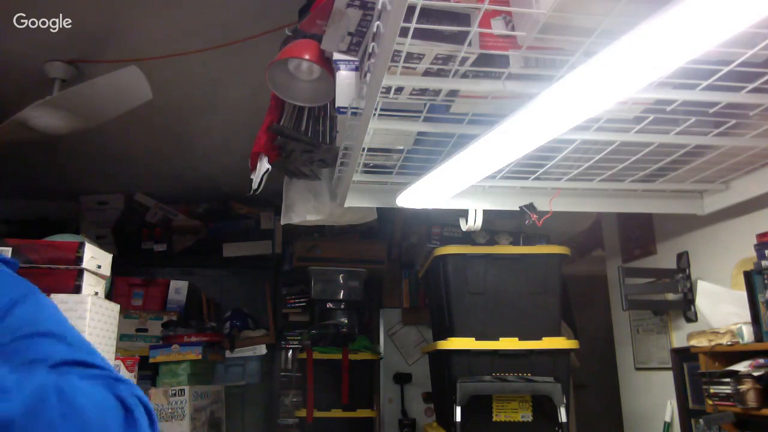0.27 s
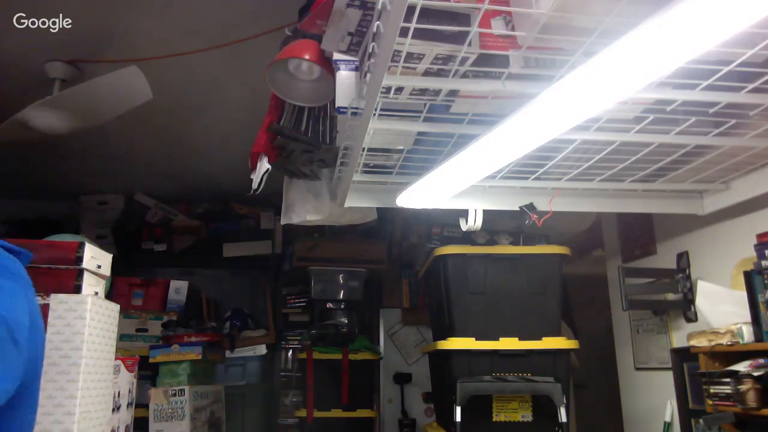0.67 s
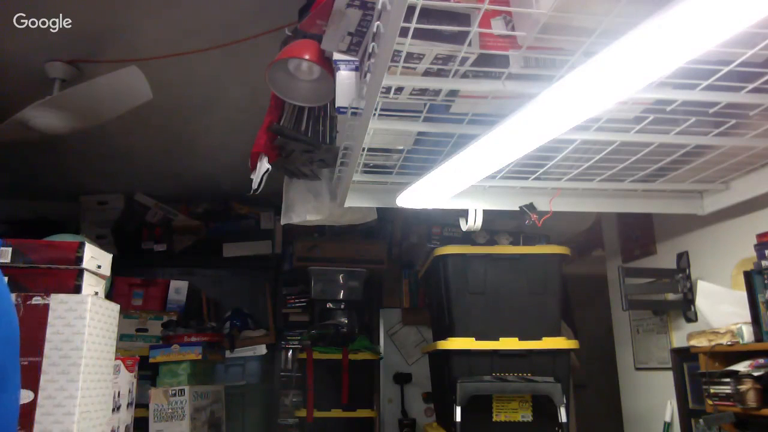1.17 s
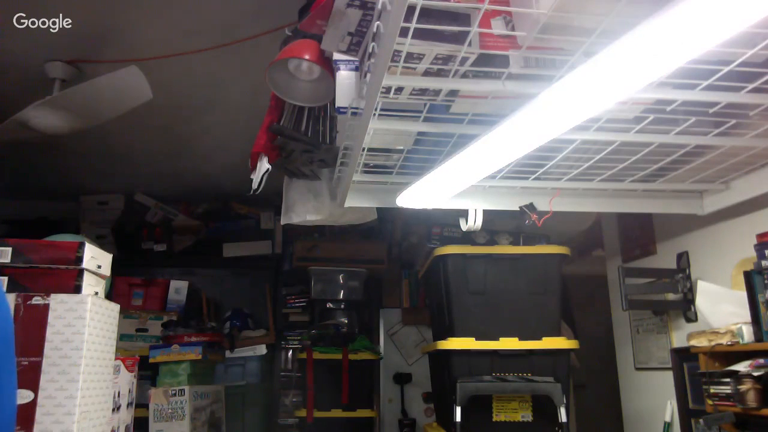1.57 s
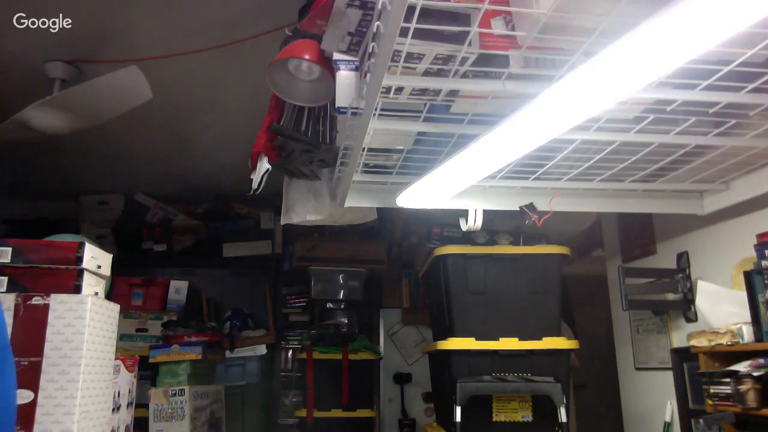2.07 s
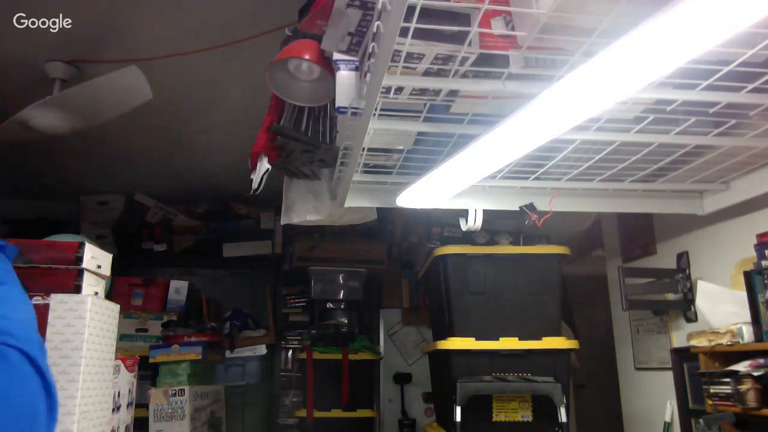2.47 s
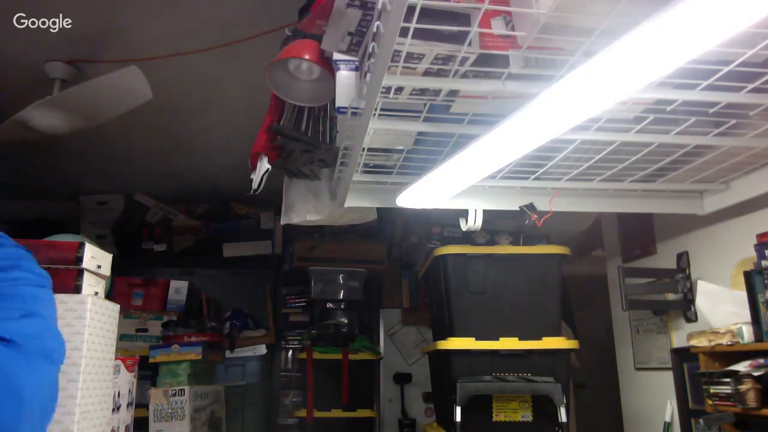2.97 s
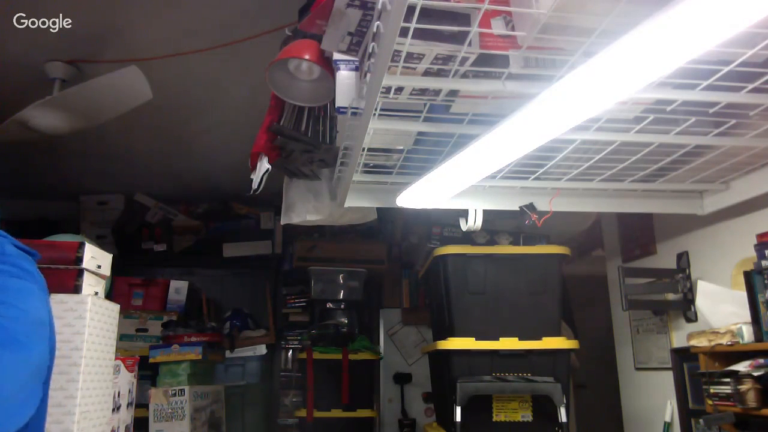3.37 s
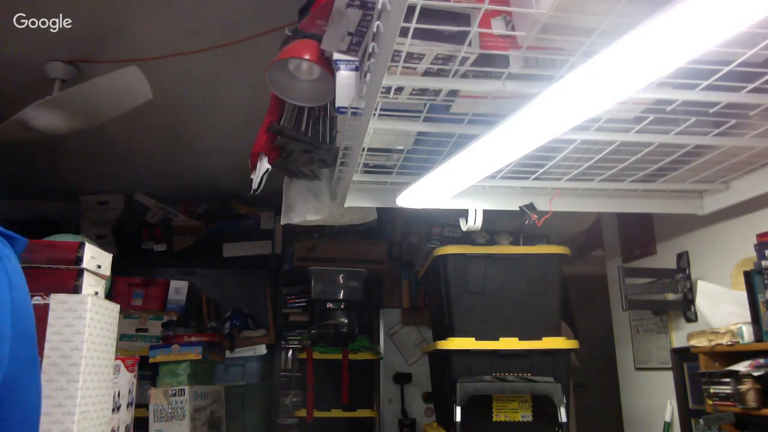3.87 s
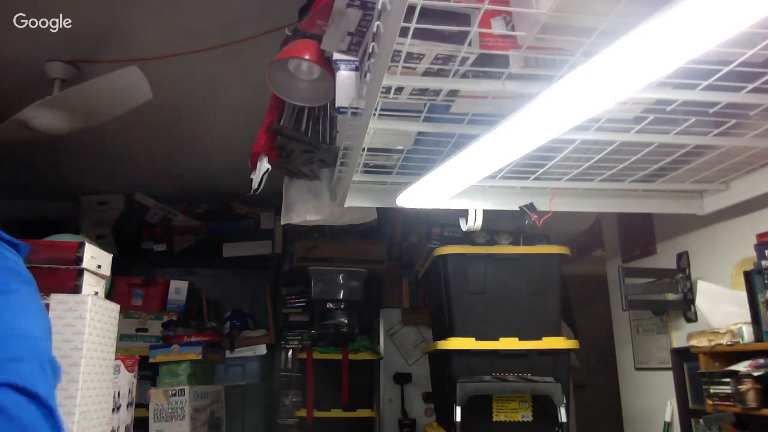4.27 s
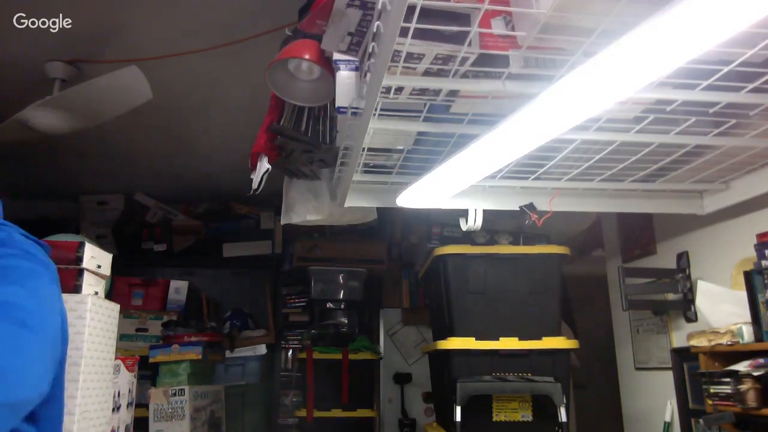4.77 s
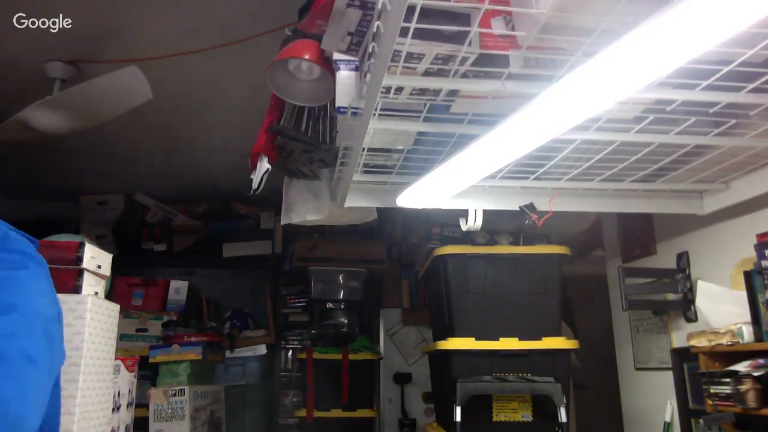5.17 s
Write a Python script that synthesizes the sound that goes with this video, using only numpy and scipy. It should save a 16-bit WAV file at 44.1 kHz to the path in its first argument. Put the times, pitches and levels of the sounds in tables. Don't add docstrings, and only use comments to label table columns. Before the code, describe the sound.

Stiff packing fill crackles and rustles in loud, irregular bursts as it is shoved into a hollow cardboard box, with dull knocks and near-silent pauses.

```python
import sys
import numpy as np
from scipy import signal
from scipy.fft import rfft, irfft, next_fast_len
from scipy.io import wavfile
from scipy.ndimage import uniform_filter1d

SR = 44100
rng = np.random.default_rng(int(sys.argv[2]) if len(sys.argv) > 2 else 0)


def voltage_ratio(level):
    return 10 ** (np.asarray(level, float) / 20)


def dump(signal):
    limited = np.clip(np.atleast_2d(signal).T, -1, 1)
    pcm = np.round(limited * 32767).astype(np.int16)
    wavfile.write(sys.argv[1], SR, pcm)


N = 239414
STEP = 32
TIMES = np.arange(N) / SR
CONTROL_TIMES = np.arange(N // STEP + 2) * STEP / SR

# frequency in Hz, level in dB.
TOP = [(6800, -8), (7900, -13.5), (8020, -5.5), (9500, -1.5), (11850, -8), (12050, -12), (14000, -18),
       (15700, -29)]
# frequency in Hz, level in dB.
PORT = [(30, -38), (60, -55.5), (150, -18), (250, -5.5)]


def evened(x):
    return x / np.sqrt(np.mean(x ** 2, -1, keepdims=True) + 1e-20)


def read(points, hz):
    f, value = np.transpose(points)
    return np.interp(np.log(hz + 1), np.log(f + 1), value)


def filtered(x, db_of):
    size = next_fast_len(N + 4096)
    gain = voltage_ratio(db_of(np.fft.rfftfreq(size, 1 / SR)))
    return irfft(rfft(x, size) * gain, size)[..., :N]


def resonate(x, hz, width, order=1):
    r = np.exp(-np.pi * width / SR)
    poles = np.poly([r * np.exp(2j * np.pi * hz / SR)] * order)
    return 2 * signal.lfilter([(1 - r) ** order], poles, x).real


def slide(x, hz, width, order=2):
    turn = np.exp(2j * np.pi * np.cumsum(hz) / SR)
    r = np.exp(-np.pi * width / SR)
    smooth = signal.lfilter([(1 - r) ** order], np.poly([r] * order), x / turn)
    return 2 * (turn * smooth).real


def wander(count, length, seconds):
    span = max(int(seconds * SR / STEP), 1)
    noise = rng.standard_normal((count, length))
    return evened(uniform_filter1d(uniform_filter1d(noise, span), span))


def colour_db(hz):
    # frequency in Hz, level in dB per Hz.
    lower_colour = [(35, -59), (60, -60.5), (194, -2.5), (382, -1.5), (431, 1), (604, -9.5), (980, -10.5),
                    (1150, -8), (1290, -12), (1570, -11), (7000, -11), (9100, -29), (15400, -120)]
    return read(lower_colour, np.minimum(hz, 6800)) + read(TOP, hz)


def push(t):
    # start in seconds, length in seconds, crackle in dB,
    # large folds in dB and fine creases in dB, these two relative to the crackle.
    shoves = [(0.0, 0.065, -20.5, -4, -17), (0.094, 0.2, -22.5, -4.5, -18.5),
              (0.283, 0.019, -20.5, -2, -17), (0.673, 0.26, -15.5, -6, -4.5), (0.939, 0.11, -24, 0.5, -1.5),
              (1.32, 0.195, -18, -2, -10.5), (1.812, 0.29, -15.5, -5.5, -5),
              (2.13, 0.094, -27.0, -0.5, -6.5), (2.647, 0.051, -23, -0.5, -10.5),
              (2.811, 0.5896, -15.5, -5.5, -7.5), (3.489, 0.077, -22, -8, -3.5),
              (3.649, 0.047, -18.5, -6.5, -3), (3.712, 0.095, -17, -2.5, -4),
              (3.83, 0.019, -20.5, -2.5, -8.5), (3.948, 0.037, -29, 4, -5.5), (4.19, 0.062, -42, 16, -7.5),
              (4.657, 0.1, -20.5, -17, -4.5), (4.917, 0.13, -27.5, -8.5, -2), (5.4, 0.05, -36.5, -3.5, 2)]
    settles = [(0, .03, -34, -20, 6), (5.11, .035, -39, 4, -20), (2.492, .03, -31, -8, -4),
               (1.3, .03, -31, 6, -14), (.875, .055, -19, -3, -4), (.44, .04, -36, -5, -3),
               (.663, .01, -24, -5, -15), (0.329, 0.029, -35, 1, -11), (2.625, 0.035, -30, -8, 2),
               (4.14, 0.046, -48.5, 4, -3), (4.34, .01, -39, -6, -8), (0.492, 0.14, -37, -7.5, -14.5),
               (1.065, 0.195, -30, -0.5, -10.5), (1.528, 0.086, -34.5, -2.5, -9.5),
               (1.777, 0.056, -36.5, -17, 2), (2.248, 0.14, -45.5, -9, -2.5),
               (2.565, 0.094, -40.5, -4.5, -3), (2.772, 0.12, -21, -13, -8), (3.443, 0.17, -25, -3, -4.5),
               (3.841, 0.077, -37, 5, -10), (4.01, 0.12, -38.5, 6.5, -3), (4.283, 0.037, -50, 9, -9),
               (4.615, 0.035, -48.5, -21, 7.5), (4.791, 0.095, -32, -12.5, -14.5),
               (5.07, 0.054, -34.5, 2, -10.5), (5.31, 0.07, -52.5, -6.5, 4)]
    rest_db = [-74, -66, -63.5, -68.5]
    walls_db = -2
    power = voltage_ratio(np.array(rest_db))[:, None] ** 2 + 0 * t
    for table, rise, fall in (shoves, 2404, 555), (settles, 1303, 421):
        falls = fall * np.array([[1], [1], [1], [1.6]])
        for s, length, db, fold_db, crease_db in table:
            hold_db = rise * np.minimum(t - s, 0) - falls * np.maximum(t - s - length, 0)
            class_db = db + np.array([fold_db + walls_db + crease_db, fold_db, 0, crease_db])
            power += voltage_ratio(class_db[:, None] + np.maximum(hold_db, -200)) ** 2
    return power


def effort(hz, t):
    # lower edge in Hz, upper edge in Hz.
    classes = [
        (150, 650),
        (700, 1700),
        (2100, 7500),
        (8200, 15000),
    ]
    # frequency in Hz, class number.
    ladder = [(600, 0), (720, 1), (1250, 1), (1650, 2), (3500, 2), (7900, 2.5), (8100, 3)]
    # time in seconds, peak in dB, large folds in dB, fine creases in dB.
    snaps = [(0.402, -32, -7, -17), (0.4244, -17, -11, -2), (0.469, -25.5, -6.5, -10),
             (0.557, -31, -7, -16), (0.592, -28, -8, -12), (1.042, -24.5, -7, 1), (1.1544, -27.5, 8, 3.5),
             (1.19, -27, 9, -1), (1.235, -21.5, -4, -3), (1.2974, -29, 7.5, -20), (1.68, -33.5, -17, -6),
             (2.122, -26, 13.5, 7.5), (2.36, -37.5, 0, 6), (2.3865, -38.5, -16, 11), (2.4713, -45.5, -6, 0),
             (2.562, -41, -10, -15.0), (2.7437, -33, 2, 1), (3.8935, -34, -6, 6), (4.067, -30, 12, 2.5),
             (4.12, -49, 9, 15), (4.2378, -26.5, 7.5, 9), (4.2874, -35, -1, 3), (4.456, -55, -1, -7),
             (4.532, -42, -27, -6), (4.9945, -16, 0, 0.5), (5.1866, -36.5, -29, 0.5)]
    slumps = [(0.097, -16, -7.5, -25), (0.1925, -14.5, -20.5, -35), (0.2229, -18.5, -24, -15),
              (0.2915, -6.5, -29, -15), (0.7, -5, -11, -14.5), (0.82, -17, -32, -16), (1.329, -23, 11, -12),
              (1.3678, -11, -4, 0.5), (1.4586, -9.5, -16, -5.5), (1.5084, -25, -12, -3),
              (1.85, -6.5, -57, -2), (1.9659, -12, -2, -4), (2.2, -16.5, -9, -8.5), (2.65, -11.5, -25, -8),
              (2.687, -19, -11, -12.5), (2.9387, -12, -5, -1.5), (3.057, -31, -3, 14),
              (3.1418, -13.5, -29, -8), (3.2096, -28, -22, 10), (3.4431, -27, -22, 6),
              (3.6077, -22.5, -8, -15), (3.76, -14.5, 0, -0.5), (3.9744, -19, -28, -5),
              (4.7237, -15.5, -8.5, -1), (4.7486, -9.5, -8.5, -5), (4.9297, -19.5, -6.5, -39),
              (5.329, -41.5, -25, 2)]
    swells = [
        (2.498, -17, -12, 1.5),
        (3.5, -4.5, -24, -2),
        (3.963, -17.5, -13, 2.5),
        (4.351, -10, -13.5, 1),
        (4.835, -11.5, -9, -6.5),
    ]
    fine = np.arange(20, 16000, 20.)
    held_db = []
    for low, high in classes:
        inside = fine[(fine > low) & (fine < high)]
        held_db.append(10 * np.log10(20 * np.sum(voltage_ratio(colour_db(inside)) ** 2)))
    held_db = np.array(held_db)
    place = np.interp(hz, *np.transpose(ladder))
    blend = np.maximum(1 - abs(place[:, None] - np.arange(len(classes))), 0)
    power = voltage_ratio(blend @ (10 * np.log10(push(t)) - held_db[:, None]) - 2.5) ** 2
    u = t[t < .3]
    for table, rise, t60 in (snaps, .0028, .11), (slumps, .004, .16), (swells, .0048, .084):
        for s, db, fold_db, crease_db in table:
            spread = max(rise * voltage_ratio(.3 * (db + 24.0)), .0005)
            shape = (1 - np.exp(-(u / spread) ** 2)) * voltage_ratio(-60 * u / t60)
            tilt_db = blend @ (np.array([fold_db - 24, fold_db, 0, crease_db]) - held_db)
            part = power[:, int((s - .7 * spread) * SR / STEP):][:, :len(u)]
            part += (voltage_ratio(db - 2.5 + tilt_db)[:, None] * shape[:part.shape[1]]) ** 2
    return power


def pings(hz, drive, t, per_s=30, t60=0.036, ping_db=-7.0):
    out = np.zeros(N)
    for k in np.flatnonzero((hz > 900) & (hz < 11000)):
        chance, size = rng.random((2, len(t)))
        pops = np.zeros(len(t) * STEP)
        pops[::STEP] = drive[k] * (chance < per_s * STEP / SR) * np.tan(2.0 * (size - .5))
        detune = np.repeat(rng.standard_normal(len(t) // 150 + 1), 150 * STEP)[:N]
        ringing = slide(pops[:N], hz[k] * (1 + .05 * detune), 1.84 / t60, order=1)
        out += ringing * np.sqrt(SR / per_s * 3)
    return voltage_ratio(ping_db) * out


def sheet(per_s=2500, spread_db=4.2, click_share=0.47, patchy_db=6.0, clumpy_db=3.0):
    edges = np.linspace(60 ** .6, 16000 ** .6, 41) ** (1 / .6)
    hz, width = (edges[1:] + edges[:-1]) / 2, np.diff(edges)
    t = CONTROL_TIMES
    few = np.clip(.5 - (10 * np.log10(push(t)[2]) + 14) / 24, .25, .9)
    power = effort(hz, t)
    facets_db = few * patchy_db * wander(len(hz), len(t), 0.033) + clumpy_db * wander(1, len(t), .006)
    drive = np.sqrt(power) * voltage_ratio(facets_db)
    out = pings(hz, np.sqrt(power), t)
    for k in range(len(hz)):
        rub = np.interp(TIMES, t, drive[k]) * rng.standard_normal(N)
        out += np.sqrt(1 - click_share) * resonate(rub, hz[k], 2.04 * width[k], order=3)

    sign, size, chance = rng.random((3, N))
    clicks = np.sign(sign - .5) * voltage_ratio(-spread_db * np.log(size + .04)) * (chance < per_s / SR)
    clicks = evened(clicks)
    below = 0
    for low, high in (50, 700), (700, 1700), (1700, 4500), (4500, 8000), (8000, 16000):
        upto = filtered(clicks, lambda f: -60 * np.clip((f - high) / 600 + .5, 0, 1) ** 3)
        strength = np.sqrt(power[(hz > low) & (hz < high)].mean(0))
        out += np.sqrt(click_share) * np.interp(TIMES, t, strength) * (upto - below)
        below = upto
    return filtered(out * np.sqrt(SR / 2), colour_db)


def box(rustle, hollow_db=0.0, flaps_db=-20.0):
    # time in seconds, peak in dB, upper tones in dB, table thud in dB.
    knocks = [(0.284, -9.5, -5, -54), (0.705, -5, 3, -23), (0.851, -8, 17, -11), (0.925, -6, 5, -17),
              (1.191, 3, -15, -22), (1.369, -11, -5, -23), (1.835, -9, -9, -25), (2.948, 1, -18, -15),
              (3.507, -14, -17, -11), (3.798, -7, 12, -17), (4.179, -29, -0.5, -33), (4.196, -6.5, 17, -33),
              (4.239, -9.5, 0, -46), (4.347, -14.5, -8, -11), (4.522, -42, -12, -14),
              (4.75, -0.5, -14, -21), (4.787, -31, -2, 3), (5, -9, 7, -21), (5.101, 9, 1, -66),
              (5.115, 10, 6, -60), (5.137, 12.5, -13, -63), (5.154, 7, -17, -24), (5.4, -25.5, -10.5, -1.5),
              (0.189, -17, -5, -40), (0.471, -33, -5, -27), (1.045, -19, 4, -18), (2.502, -20, -12, -14),
              (4.833, -5, 0, -47), (4.929, -8, -8, -29), (4.899, -27, 5, -34)]
    # frequency in Hz, width in Hz, level in dB.
    box_tones = [(88, 25, 26.5), (136, 25, 3), (212, 40, -14), (266, 44, -13), (450, 41, -6.5),
                 (550, 30, -17.5), (950, 540, -2), (1130, 28, -15.5), (720, 200, -25)]
    slack_hz = 34
    u = np.arange(300) / SR
    soft_push = u / .0004 * np.exp(-u / 0.00023)
    blows, out = np.zeros((3, N)), np.zeros(N)
    for s, db, upper_db, table_db in knocks:
        blows[:, round(s * SR)] += voltage_ratio(db + np.array([table_db, 0, upper_db]))
    blows = signal.oaconvolve(blows, soft_push[None] / soft_push.sum())[:, :N]
    blows[0] = uniform_filter1d(uniform_filter1d(blows[0], 150), 150)
    for k, (hz, width, db) in enumerate(box_tones):
        width = max(width, slack_hz)
        blow = blows[int(hz > 150) + int(hz > 700)] * SR / (2 * np.pi * width)
        shaken = voltage_ratio(hollow_db if hz < 700 else flaps_db) * rustle * (hz > 150)
        out += (-1) ** k * voltage_ratio(db) * resonate(blow + shaken, hz, width)
    return filtered(out, lambda hz: read(PORT, hz))


def room(x):
    # frequency in Hz, time to fall by 60 dB in seconds.
    room_decay = [(300, 0.16), (2000, 0.097), (10000, 0.019)]
    hz, t, z = signal.stft(rng.standard_normal(SR // 2), SR, nperseg=128)
    dying = z * voltage_ratio(-60 * t / read(room_decay, hz)[:, None])
    tail = signal.istft(dying, SR, nperseg=128)[1]
    tail[:150] = 0
    return signal.fftconvolve(x, tail / np.linalg.norm(tail))[:N]


def hush(level_db=-110):
    # frequency in Hz, level in dB per Hz.
    hush_colour = [(35, -57), (60, -24), (396, -85), (983, -22), (1160, 47.5), (1640, 3), (7640, -46),
                   (8990, 29), (15700, -59)]
    noise = filtered(rng.standard_normal(N), lambda hz: read(hush_colour, hz))
    return voltage_ratio(level_db) * evened(noise)


def rumble(rumble_db=-19.0, lumpy_db=3.0):
    t = CONTROL_TIMES
    drive = np.sqrt(push(t)[0]) * voltage_ratio(rumble_db + lumpy_db * wander(1, len(t), 0.029)[0])
    shake = np.interp(TIMES, t, drive) * rng.standard_normal(N)
    tones = resonate(shake, 100.5, 28, order=2) + resonate(shake, 138, 50, order=2)
    shudder = evened(tones) * np.sqrt(np.mean(drive ** 2))
    return filtered(shudder, lambda hz: -24 * np.clip((75 - hz) / 35, 0, 1))


def rings(width=70):
    # start in seconds, length
    # in seconds, frequency in Hz, level in dB.
    rubbed = [(0.186, 0.018, 5350, -37), (0.548, 0.028, 1450, -36), (1.297, 0.27, 1140, -28),
              (1.68, 0.005, 9300, -37), (1.681, 0.0075, 1940, -33), (1.682, 0.0075, 3600, -30.5),
              (2.259, 0.085, 1090, -41), (2.286, 0.013, 6920, -42), (2.482, 0.032, 1664, -36),
              (2.555, 0.015, 834, -35.5), (2.762, 0.04, 1300, -30), (3.902, 0.025, 6770, -29.5),
              (3.904, 0.007, 3320, -25), (3.952, 0.023, 4260, -20.5), (3.962, 0.031, 2860, -26.5),
              (3.95, 0.06, 1170, -25), (4.03, 0.078, 1130, -29.5), (4.118, 0.05, 1050, -37),
              (4.2, 0.03, 1156, -24), (4.535, 0.021, 3560, -47.5), (4.628, 0.07, 3110, -37),
              (4.885, 0.056, 1546, -34.5), (4.886, 0.03, 4230, -36), (5.329, 0.017, 4190, -36.5),
              (5.388, 0.047, 5470, -39),
              (0.099, 0.067, 1200, -25), (0.161, 0.041, 1947, -25), (0.22, 0.019, 2090, -24),
             (1.235, 0.01, 1154, -29), (1.682, 0.0053, 706, -38), (2.57, 0.037, 2520, -47),
             (2.27, 0.069, 1990, -47), (2.36, .05, 1020, -48.5), (2.73, 0.033, 900, -38),
             (4.27, 0.051, 1560, -45.5), (4.659, .04, 2720, -29), (4.72, 0.065, 1012, -30.5),
             (5.24, .07, 140, -61), (1.2, 0.056, 140, -48), (2.6, .04, 1240, -44), (2.69, 0.024, 2170, -29),
             (.05, 0.05, 2020, -29), (.13, 0.027, 1990, -30), (4.2, 0.056, 483, -28),
             (3.95, 0.066, 493, -33), (5.41, .02, 1300, -34), (2.685, 0.009, 1730, -27),
             (3.43, 0.054, 1550, -27), (4.513, 0.034, 150, -43), (4.79, 0.087, 93, -54),
             (5.18, 0.02, 4850, -40), (5.18, .02, 5450, -40), (5.182, .012, 6000, -44),
             (5.225, .03, 6800, -54), (5.211, 0.032, 450, -45.5), (5.405, .03, 2180, -37)]
    # start in seconds, length in seconds,
    # first frequency in Hz, last frequency in Hz, level in dB.
    glides = [(4.755, 0.063, 300, 110, -36), (.22, .02, 4000, 3770, -29), (.28, .045, 450, 433, -27),
              (.43, 0.032, 3820, 3470, -27), (.47, .02, 4320, 4350, -38), (.52, 0.035, 3900, 3900, -46),
              (.59, 0.018, 5540, 5370, -40), (1.11, 0.016, 1210, 1220, -36), (1.15, 0.015, 1140, 1150, -34),
              (1.25, 0.016, 1090, 1130, -24), (2.285, .04, 4530, 4700, -47), (2.32, 0.093, 6600, 6300, -40),
              (2.36, 0.048, 4650, 5000, -38.5), (2.348, 0.069, 2320, 2440, -46.5),
              (2.485, 0.051, 3280, 3150, -34.5), (2.555, .03, 3220, 3200, -36),
              (2.585, 0.027, 3380, 3460, -30), (2.56, 0.049, 4450, 4440, -44), (2.56, .04, 1880, 1900, -58),
              (2.65, 0.025, 4470, 4570, -49), (2.745, .03, 3120, 3240, -35),
              (3.445, 0.054, 2870, 2940, -28), (3.45, 0.023, 4240, 4290, -27.5),
              (3.56, 0.068, 4360, 4250, -31), (3.56, 0.024, 5500, 5500, -27.5),
              (3.65, .03, 6600, 6483, -31), (3.65, 0.022, 4620, 5200, -26), (3.97, 0.02, 5160, 5030, -26),
              (4.065, 0.025, 4030, 4140, -40), (4.29, 0.054, 3660, 3620, -43.5),
              (4.29, 0.034, 4200, 4300, -40.5), (4.35, 0.013, 3120, 3090, -18),
              (4.36, 0.024, 4400, 4400, -27), (4.35, 0.014, 6600, 6370, -22.5),
              (4.66, 0.072, 1520, 1600, -32), (4.69, 0.098, 398, 385, -30), (4.83, 0.065, 450, 450, -37.5),
              (4.93, 0.12, 1990, 1950, -31), (5.0, 0.04, 400, 417, -38), (5.1, 0.048, 1007, 950, -23)]
    out = np.zeros(N)
    steady = [(s, length, hz, hz, db) for s, length, hz, db in rubbed]
    for s, length, hz, end_hz, db in steady + glides:
        u = np.arange(int((length + 0.15) * SR)) / SR
        stroke = np.minimum(u / 0.0026, 1) * voltage_ratio(-1100 * np.maximum(u - length, 0))
        stutter = evened(uniform_filter1d(rng.standard_normal(len(u)), 220))
        stroke *= voltage_ratio(3.5 * stutter - 1.5)
        pitch = np.interp(u, [0, length], [hz, end_hz])
        tone = slide(rng.standard_normal(len(u)), pitch, min(width + .022 * hz, hz / 3))
        part = out[round(s * SR):][:len(u)]
        part += (voltage_ratio(db) * stroke * evened(tone))[:len(part)]
    return out


def ticks():
    # time in seconds, peak in dB.
    flips = [(0.1007, -2), (0.305, -3), (0.4739, -14), (1.0445, -6), (1.5106, -3), (1.8144, -1),
             (2.1236, -4), (2.6507, -3), (2.6862, -4), (2.8777, -1), (3.1662, -1), (3.1864, -1),
             (4.2407, -6), (4.6819, -5), (4.7011, -6), (0.2955, -1), (0.4255, -6), (1.156, -10),
             (1.298, -12), (2.763, -6), (3.976, -1), (4.068, -6), (4.077, -7), (4.1965, -12), (4.9, -12),
             (.402, -18), (2.362, -19), (2.388, -17), (3.38, -1), (3.51, -2), (3.752, -1), (4.223, -16),
             (4.245, -7), (4.939, -8), (.678, -1), (.71, 0), (1.365, -2), (1.417, -2)]
    out, u = np.zeros(N), np.arange(130) / SR
    for s, db in flips:
        pitch, sign = rng.random(2)
        flip = 1.6 * np.sin(2 * np.pi * 1800 * 2.5 ** pitch * u) * np.exp(-u / .0003)
        out[round(s * SR):][:len(u)] += voltage_ratio(db - 3.5) * np.sign(sign - .5) * flip
    coloured = filtered(out, lambda hz: read(TOP, hz) + read(PORT, hz / 4))
    return np.clip(coloured, -.8, .8)


def strikes():
    # time in seconds, frequency in Hz, peak in dB, time to fall by 60 dB in seconds.
    flicks = [(.402, 2500, -30, .03), (1.156, 1140, -18, .05), (1.298, 1100, -14, .06),
              (1.774, 1120, -38, .06), (1.776, 5000, -32, .03), (2.362, 4700, -28, .05),
              (2.489, 1640, -29, .1), (2.686, 2000, -12, .04), (2.763, 1330, -14, .06),
              (2.763, 3300, -16, .04), (3.976, 4200, -12, .04), (3.976, 5100, -14, .03),
              (4.067, 1080, -11, .05), (4.1965, 1120, -8, .06), (4.223, 1150, -15, .04),
              (4.9, 1560, -22, .04), (4.75, 400, -14, .08), (1.016, 1100, -14, .04),
              (1.813, 3000, -12, .02), (.663, 3500, -14, .02)]
    out, u = np.zeros(N), np.arange(SR // 8) / SR
    for s, hz, db, t60 in flicks:
        pair = np.sin(2 * np.pi * hz * u) + .6 * np.sin(2 * np.pi * 1.09 * hz * u)
        dying = voltage_ratio(db - 3 - 60 * u / t60) * np.minimum(u / .0008, 1)
        out[round(s * SR):][:len(u)] += dying * pair
    return out


def scene():
    rustle = sheet() + ticks()
    near = rustle + strikes() + rings() + box(rustle)
    mono = near + voltage_ratio(-16) * room(near) + hush() + rumble()
    return np.array([mono, mono])


def low_pass(x):
    return signal.sosfilt(signal.butter(12, 15880, fs=SR, output="sos"), x)


def record(dry):
    power_db = 10 * np.log10(abs(uniform_filter1d(dry[0] ** 2, 600)) + 1e-12)
    hushed = dry * voltage_ratio(-.35 * np.clip(-48 - power_db, 0, 20))
    over = np.maximum(abs(hushed) - .55, 0)
    rounded = hushed - np.sign(hushed) * (over - .33 * np.tanh(over / .33))

    def band_db(hz):
        return -90 * np.clip((hz - 15500) / 400, 0, 1) - 6 * np.clip((85 - hz) / 30, 0, 1)

    return low_pass(filtered(rounded, band_db))


dry = scene()
out = record(dry)
dump(out)
```